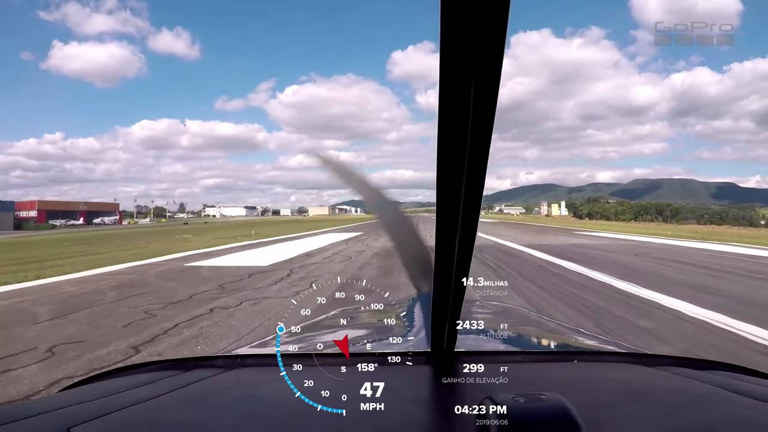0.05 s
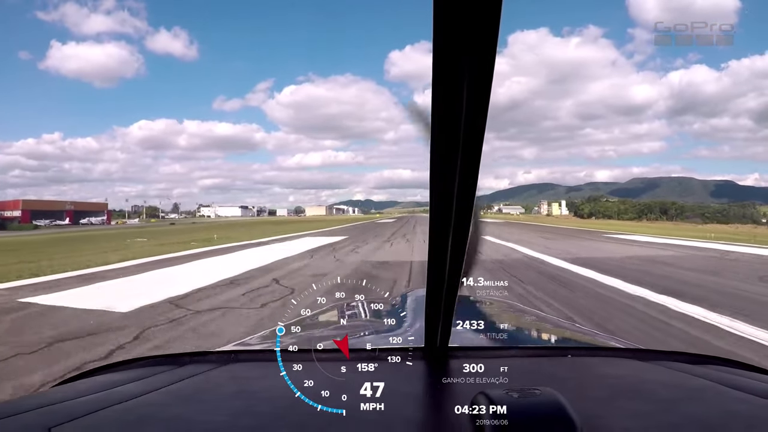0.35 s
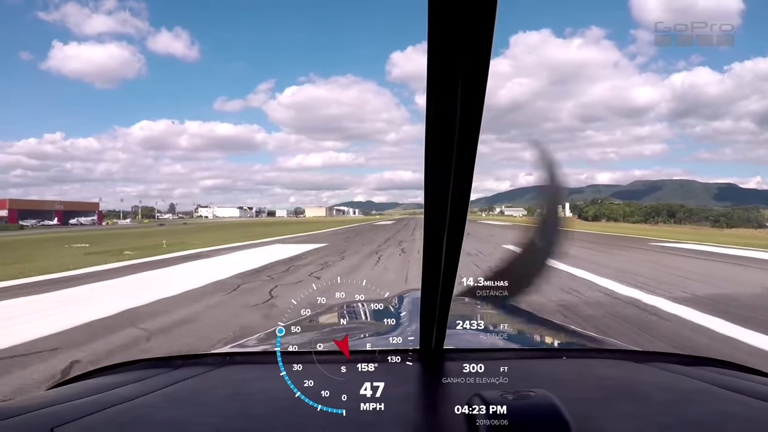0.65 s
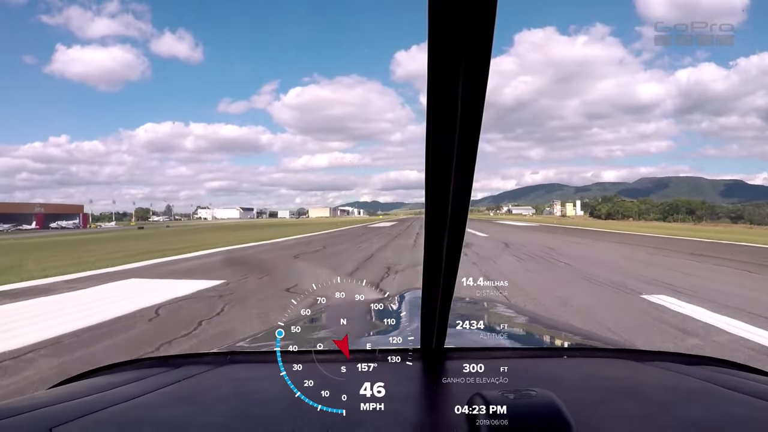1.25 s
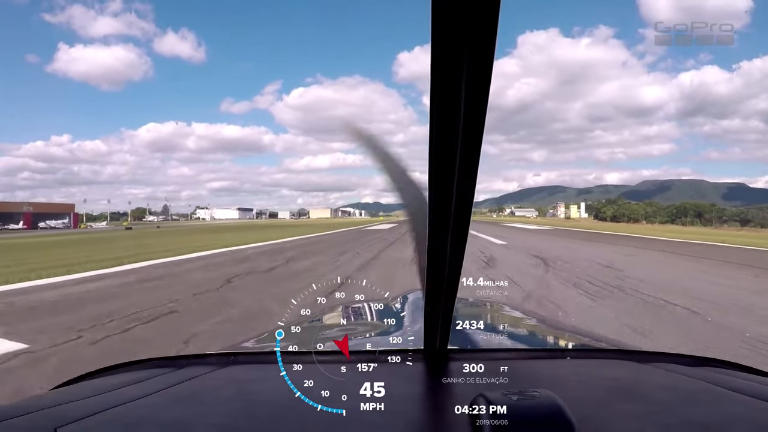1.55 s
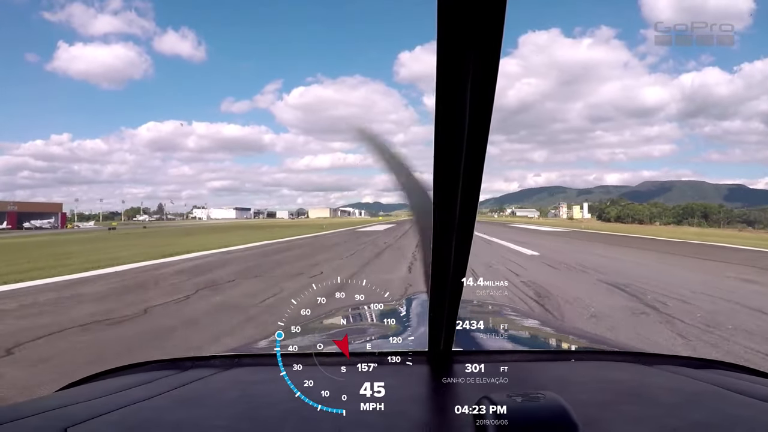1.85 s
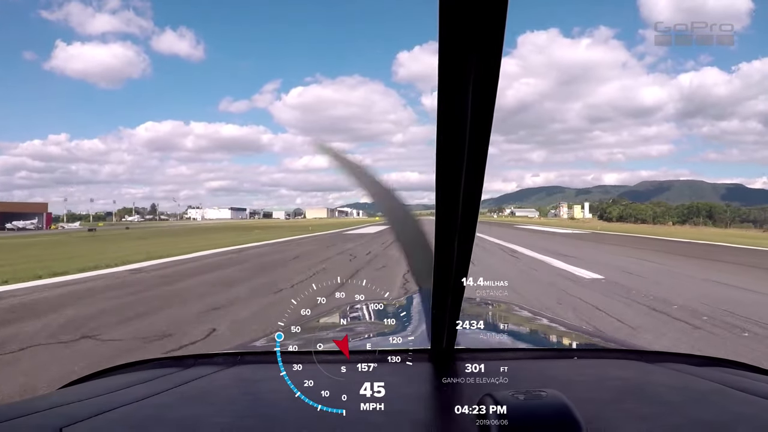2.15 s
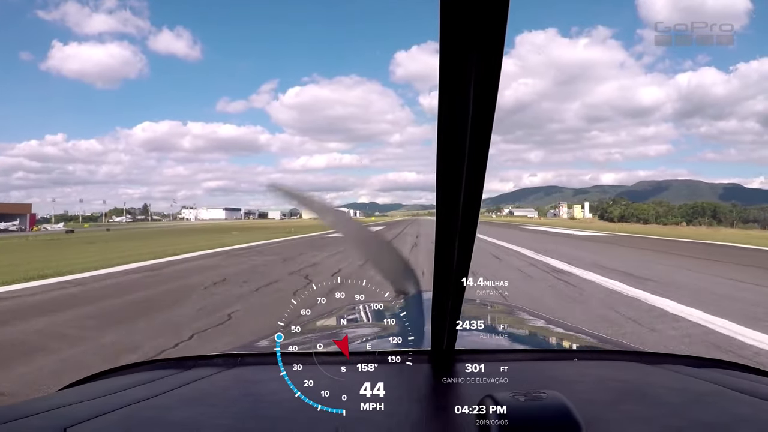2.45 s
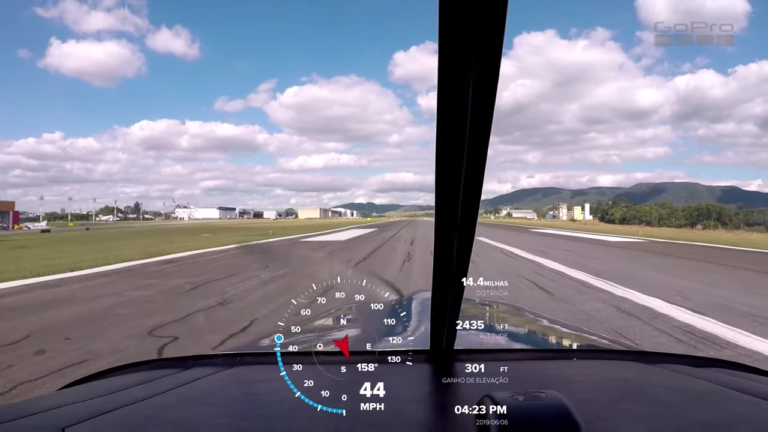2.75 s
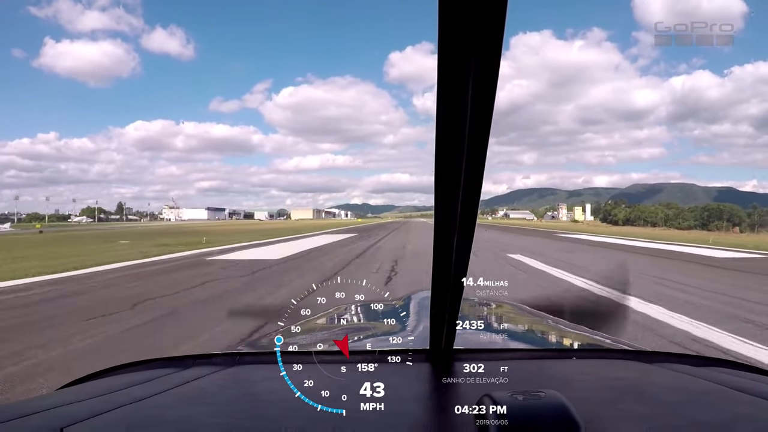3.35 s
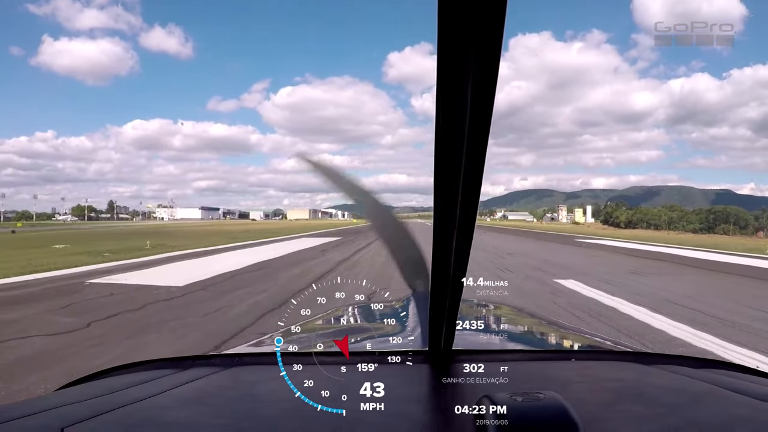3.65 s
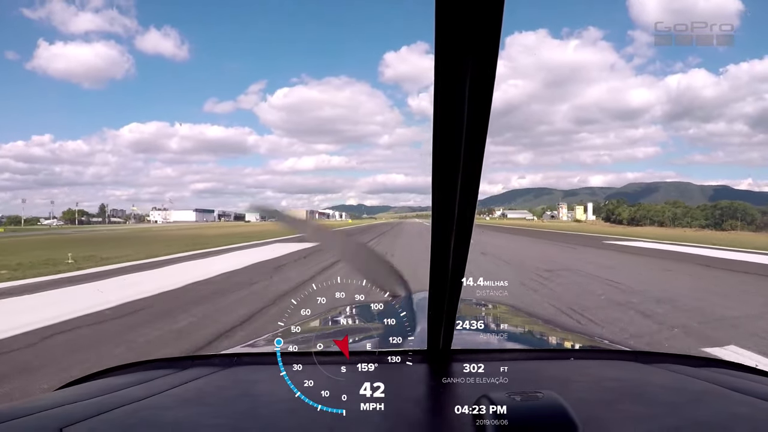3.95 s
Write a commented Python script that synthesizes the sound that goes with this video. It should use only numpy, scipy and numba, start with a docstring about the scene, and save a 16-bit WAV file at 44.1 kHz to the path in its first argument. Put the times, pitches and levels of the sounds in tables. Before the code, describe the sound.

Heard from the cabin, a small propeller plane rumbles along a runway, its low engine throb blending with drumming tyres and wind hiss. The airframe thumps once, and a thin, slowly falling tyre whine follows.

```python
"""A small propeller plane's engine throbs near idle, heard in the cabin as it rolls and slowly loses speed.
Out-of-round tyres drum and their tread whines. Tarmac rumble and propeller wash drive the cabin's
resonances, air hisses past the canopy and loose trim ticks. One bump shakes the airframe.
A limiter holds the peaks down."""
import sys
import numpy as np
from scipy import signal
from scipy.fft import rfft, irfft
from scipy.io import wavfile
from scipy.ndimage import uniform_filter1d, minimum_filter1d
from numba import njit

SR = 44100
rng = np.random.default_rng(int(sys.argv[2]) if len(sys.argv) > 2 else 0)


def digitize_waveform(pressure):
    """Quantize a signal to 16-bit integers and store it at the path in sys.argv[1].

    Rows of a 2-D input are taken as channels; values are limited to [-1, 1].
    """
    field = np.atleast_2d(pressure).T
    bounded = np.clip(field, -1, 1)
    quanta = np.round(bounded * 32767).astype(np.int16)
    wavfile.write(sys.argv[1], SR, quanta)


N = 176400
TIME_S = np.arange(N) / SR


def undb(db):
    """Decibels to gain."""
    return 10 ** (np.asarray(db) / 20)


def curve(rows):
    """A (time, value) table joined by straight lines."""
    return np.interp(TIME_S, *np.array(rows).T)


def walk(rate_hz):
    """Smooth random wander with a spread near 1."""
    hold = int(SR / rate_hz)
    steps = np.repeat(rng.standard_normal(N // hold + 1), hold)
    return 1.3 * uniform_filter1d(uniform_filter1d(steps, hold), hold)[:N]


def noise(gain):
    """Noise with amplitude gain(hz) per root Hz."""
    hz = np.arange(N // 2 + 1) * SR / N + 1e-3
    return irfft(rfft(rng.standard_normal(N)) * gain(hz), N) * np.sqrt(SR / 2)


def coloured(spectrum):
    """Noise shaped by (frequency [Hz], density [dB/Hz]) points."""
    points_hz, db = np.array(spectrum).T
    return noise(lambda hz: undb(np.interp(np.log(hz), np.log(points_hz), db, right=-200)))


def resonance(centre_hz, width_hz):
    """Noise through a steep resonance, 0 dB/Hz at the peak."""
    q = centre_hz / width_hz
    return noise(lambda hz: 1 / (1 + (q * (hz / centre_hz - centre_hz / hz)) ** 2 / 2))


def band(centre_hz, width_hz):
    """Noise of rms 1 in a Gaussian band."""
    bell = noise(lambda hz: np.exp(-((hz - centre_hz) / width_hz) ** 2))
    return bell / np.sqrt(width_hz * np.sqrt(np.pi / 2))


def angle(speed_hz):
    """Running angle [rad] at the tabled speed."""
    return 2 * np.pi * np.cumsum(curve(speed_hz)) / SR


def partial(phase, waver_db, slip_rad, rate_hz):
    """A tone of rms near 1 whose level and phase waver."""
    tone = np.sqrt(2) * np.sin(phase + rng.uniform(0, 2 * np.pi) + slip_rad * walk(rate_hz))
    return tone * undb(waver_db * walk(rate_hz))


def swell(at_s, sigma_s):
    """Gaussian rise and fall, peak 1."""
    return np.exp(-.5 * ((TIME_S - at_s) / sigma_s) ** 2)


# (time [s], throb rate [Hz])
THROB_HZ = [(0, 37.4), (1, 37.05), (1.8, 36.62), (2.1, 36.15), (2.7, 36.1), (3, 36.3), (4, 36.22)]
# (multiple of the throb, level [dB])
ENGINE_PARTIALS = [(.5, -61.5), (1, -36.5), (2, -47.5), (3, -44), (4, -57), (5, -55.5), (6, -54), (12, -68),
                   (24, -66), (27, -67.5)]
# (time [s], gain [dB])
ENGINE_GAIN_DB = [(0, -2), (.7, 0), (1.5, -4), (2.3, 3), (2.7, 1), (3.3, 5.5), (3.75, 0), (4, -5.5)]


def engine(throb, slip_rad=0.034, scatter_db=3):
    """Firings of uneven timing and strength shake the cabin; the partials line up in one pulse a throb."""
    uneven = throb + slip_rad * walk(30)
    pulses = 0
    for order, db in ENGINE_PARTIALS:
        tone = np.sqrt(2) * np.cos(order * uneven + .2 * walk(6))
        pulses += tone * undb(db + 1.5 * walk(6))
    return pulses * undb(curve(ENGINE_GAIN_DB) + scatter_db * walk(50))


# (time [s], wheel turn rate [Hz])
WHEEL_HZ = [(0, 20.82), (1, 20.42), (2, 19.75), (3, 19.25), (4, 18.65)]
# strongest tyre partial (time [s], level [dB])
DRONE_DB = [(0, -35.5), (.3, -34), (1.25, -34.5), (2, -34), (3, -41.5), (3.5, -32.5), (3.85, -41.5),
            (4, -37)]
# (multiple of the turn, start level [dB], end level [dB])
TYRE_PARTIALS = [(2, -37.5, -49), (4, -57, -54.5), (5, -47.5, -54), (6, -56.5, -45.5), (7, -54.5, -43.5),
                 (8, -56.5, -55), (9, -50.5, -54), (10, -58.5, -50.5), (11, -54.5, -55), (14, -71, -60.5)]
# (time [s], sigma [s], multiple of the turn, added level [dB])
TYRE_SWELLS = [(1.5, 0.29, 10, -47), (1.801, .4, 8, -48.5), (1.85, 0.54, 9, -48.5), (2.55, 0.12, 6, -47.5),
               (2.75, 0.47, 14, -60), (3.4, 0.19, 10, -47.5), (3.7, 0.3, 7, -43.5)]


def tyre_drum(turn):
    """Out-of-round tyres drum at multiples of the wheel's turn, sinking as the plane slows."""
    drum = undb(curve(DRONE_DB)) * partial(3 * turn, waver_db=0.5, slip_rad=0.19, rate_hz=7)
    for order, start_db, end_db in TYRE_PARTIALS:
        gain = undb(np.linspace(start_db, end_db, N))
        gain += sum(undb(db) * swell(at_s, sigma_s) for at_s, sigma_s, k, db in TYRE_SWELLS if k == order)
        drum += gain * partial(order * turn, waver_db=3.5, slip_rad=0.21, rate_hz=4.93)
    return drum


# (frequency [Hz], density [dB/Hz])
RUMBLE_SPECTRUM = [(8, -71), (22, -57.5), (32, -56), (46, -51), (68, -55), (86, -57.5), (110, -54.5),
                   (128, -60), (160, -62), (190, -61), (240, -66.5), (290, -79), (500, -100)]
# (time [s], gain [dB])
RUMBLE_GAIN_DB = [(0, -2), (1, -1.2), (2, 0.51), (3, 0.49), (3.6, -0.83), (4, -0.38)]
# (time [s], peak density [dB/Hz])
BOOM_DENSITY = [(0, -51), (.7, -59.5), (1.5, -59.5), (2.3, -52.5), (2.9, -49.5), (3.2, -55.5), (3.6, -47),
                (4, -64)]
BOOM_HZ = 103.6


def tarmac():
    """The runway rumbles through the airframe and drives the cabin's low boom."""
    rumble = coloured(RUMBLE_SPECTRUM) * undb(curve(RUMBLE_GAIN_DB))
    return rumble + resonance(BOOM_HZ, width_hz=23) * undb(curve(BOOM_DENSITY))


# (frequency [Hz], width [Hz], peak density [dB/Hz])
CABIN_MODES = [(368.6, 54.6, -68), (607, 68, -78), (778, 29, -84.5), (970, 43, -77), (1654, 83, -83.5),
               (1833, 30, -86), (2040, 93, -90.5), (2630, 290, -100), (5420, 300, -99)]
# (time [s], gain [dB])
MODE_GAIN_DB = [(0, 2.5), (.5, 0.5), (1.2, -1.5), (1.6, 0.5), (2.1, 0.5), (2.6, 1), (3.4, -1), (4, 1)]
# one resonance that sings now and then (time [s], level [dB])
SING_DB = [(0, -77), (.2, -66), (.35, -64), (.54, -54), (.62, -67), (1.1, -71), (1.35, -63), (1.6, -59.5),
           (2.02, -61), (2.3, -73), (3.4, -69), (4, -60)]
# (frequency [Hz], density [dB/Hz])
ROAR_SPECTRUM = [(150, -92), (320, -82), (520, -77.5), (690, -77.5), (820, -83), (1150, -82.5),
                 (1450, -85.5), (1650, -85.5), (1850, -92), (2500, -95), (3300, -103), (5000, -112),
                 (9000, -130)]
# (time [s], gain [dB])
ROAR_GAIN_DB = [(0, -1.6), (.6, 0.29), (1.15, 0.39), (1.6, 0.9), (2.1, 0.46), (3, 0.023), (4, -0.51)]


def propeller_wash(throb, throb_depth=0.031, sing_hz=996):
    """Wash and tyres roar and ring the cabin's resonances, pulsing slightly with the engine."""
    modes = sum(undb(db) * resonance(hz, width_hz) for hz, width_hz, db in CABIN_MODES)
    ringing = modes * undb(curve(MODE_GAIN_DB))
    tone = partial(2 * np.pi * sing_hz * TIME_S, waver_db=0.5, slip_rad=.9, rate_hz=30)
    singing = tone * undb(curve(SING_DB))
    roar = coloured(ROAR_SPECTRUM) * undb(curve(ROAR_GAIN_DB))
    return (roar + ringing + singing) * (1 + throb_depth * np.cos(throb))


def cabin_walls(x, gain_db=-13, decay_s=0.0054):
    """Close reflections from glass and panels ripple the spectrum."""
    t = TIME_S[:int(.06 * SR)]
    tail = rng.standard_normal(len(t)) * np.exp(-t / decay_s)
    return x + undb(gain_db) * signal.fftconvolve(x, tail / np.linalg.norm(tail))[:N]


# (frequency [Hz], density [dB/Hz])
HISS_SPECTRUM = [(2000, -125), (3400, -109), (3900, -102), (4500, -96), (5700, -94), (6500, -100),
                 (7200, -105), (8500, -111), (10000, -119), (12500, -133), (15500, -141)]
# (time [s], gain [dB])
HISS_GAIN_DB = [(0, 0.3), (.5, -0.8), (.9, 0.64), (1.15, 0.5), (1.4, -0.34), (1.85, 0.3), (2.2, -2.1),
                (2.9, -1.1), (3.3, -0.7), (4, -2)]
# top of the hiss (time [s], peak density [dB/Hz])
SIZZLE_DENSITY = [(0, -122), (.8, -118), (1.1, -116), (1.4, -119), (1.85, -114), (2.1, -124), (2.5, -126),
                  (2.95, -117), (3.2, -125), (4, -123)]


def canopy(flutter_db=0.7):
    """Air hisses past the canopy, fluttering slightly, with a faint whistle."""
    hiss = coloured(HISS_SPECTRUM) * undb(curve(HISS_GAIN_DB))
    sizzle = resonance(7300, width_hz=1900) * undb(curve(SIZZLE_DENSITY))
    whistle = resonance(5360, width_hz=40) * undb(-88.5)
    return cabin_walls((hiss + sizzle) * undb(flutter_db * walk(22))) + whistle


# (time [s], level [dB])
WHINE_DB = [(0, -81), (1, -65.5), (1.55, -56.5), (1.9, -53), (2.12, -57.5), (2.45, -51.5), (2.7, -50.5),
            (2.85, -55.5), (3.25, -50.5), (3.55, -54), (4, -64)]
# (time [s], level [dB])
OCTAVE_DB = [(0, -80), (1, -73.5), (1.25, -61.5), (1.6, -68), (2, -74), (2.25, -58.5), (2.45, -73),
             (2.7, -59.5), (3.05, -57), (3.45, -62), (3.68, -59), (4, -68)]


def tyre_whine(turn, order=32, neighbour_order=34):
    """The tread sings a thin falling note, with a rougher octave and a brief upper neighbour."""
    note = partial(order * turn, waver_db=2.5, slip_rad=0.55, rate_hz=24)
    tread_noise = undb(-21) * resonance(598, width_hz=77)
    octave = partial(2 * order * turn, waver_db=2, slip_rad=.9, rate_hz=32)
    neighbour = partial(neighbour_order * turn, waver_db=0, slip_rad=0.37, rate_hz=20)
    return ((note + tread_noise) * undb(curve(WHINE_DB))
            + octave * undb(curve(OCTAVE_DB))
            + neighbour * undb(-53.5) * swell(at_s=3.64, sigma_s=0.11))


def trim_ticks(per_s=2.1, gain_db=-70.5, width_hz=6000):
    """Loose trim ticks faintly at random times."""
    times_s = rng.uniform(0, N / SR, int(per_s * N / SR))
    taps = sum(swell(at_s, sigma_s=0.00045) for at_s in times_s)
    return undb(gain_db) * taps * resonance(7500, width_hz) / np.sqrt(width_hz)


# (time [s], sigma [s], frequency [Hz], width [Hz], level [dB])
FITTING_RUSTLES = [(.99, 0.033, 350, 74, -42.5), (1.018, 0.015, 5750, 930, -54),
                   (1.012, 0.016, 5700, 4500, -64.5), (1.105, 0.063, 1250, 860, -54),
                   (1.05, 0.039, 2250, 630, -59.5), (1.14, 0.045, 5900, 820, -67)]


def bump(jolt_s=1.0, boom_db=-27.5):
    """A jolt makes the airframe boom and its fittings rustle."""
    tone = np.sqrt(2) * np.sin(2 * np.pi * BOOM_HZ * (TIME_S - jolt_s))
    boom = tone * swell(jolt_s, sigma_s=0.045) * undb(boom_db)
    rustle = sum(undb(db) * swell(at_s, sigma_s) * band(hz, width_hz)
                 for at_s, sigma_s, hz, width_hz, db in FITTING_RUSTLES)
    return boom + rustle


def scene():
    """Everything heard in the cabin, in mono."""
    throb, turn = angle(THROB_HZ), angle(WHEEL_HZ)
    tones = engine(throb) + tyre_drum(turn) + tyre_whine(turn)
    rush = tarmac() + propeller_wash(throb) + canopy()
    return (tones + rush + bump() + trim_ticks())[None]


@njit
def peak_follow(x, release_s):
    """Jumps to each peak and decays exponentially."""
    decay = np.exp(-1 / (release_s * SR))
    envelope, held = np.empty(len(x)), 0.
    for i in range(len(x)):
        held = max(abs(x[i]), held * decay)
        envelope[i] = held
    return envelope


def record(dry):
    """A soft-kneed look-ahead limiter holds the peaks; a steep low-pass cuts the top."""
    limit_db, window_samples, top_hz = -19.5, 220, 15700
    peak = peak_follow(dry[0], release_s=0.019)
    gain = (1 + (peak / undb(limit_db)) ** 6) ** (-1 / 6)
    gain = uniform_filter1d(minimum_filter1d(gain, window_samples), window_samples)
    lowpass = signal.ellip(8, .2, 70, top_hz, fs=SR, output="sos")
    return signal.sosfilt(lowpass, dry * gain)


dry = scene()
out = record(dry)
digitize_waveform(out)
```